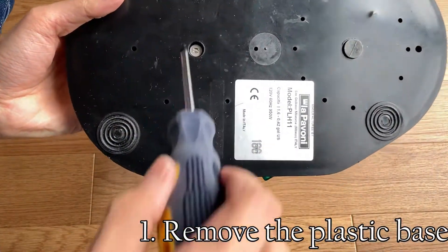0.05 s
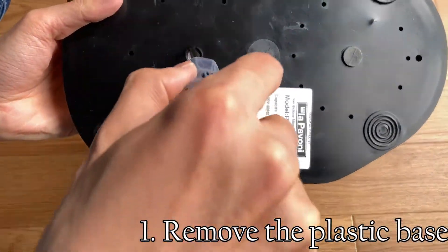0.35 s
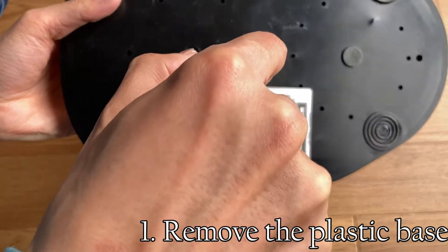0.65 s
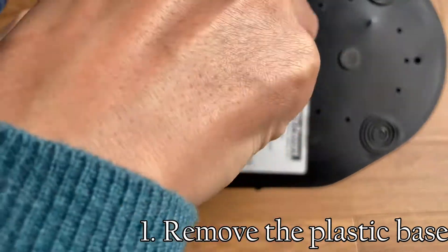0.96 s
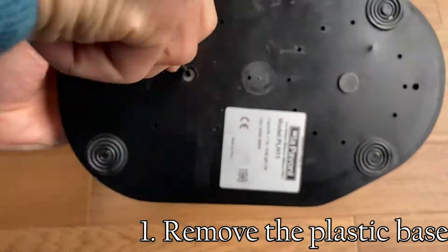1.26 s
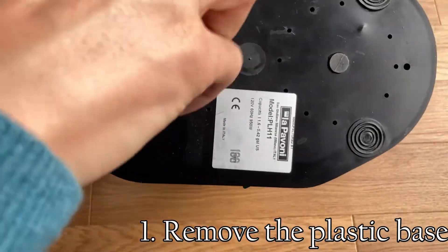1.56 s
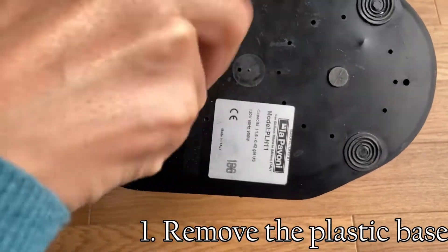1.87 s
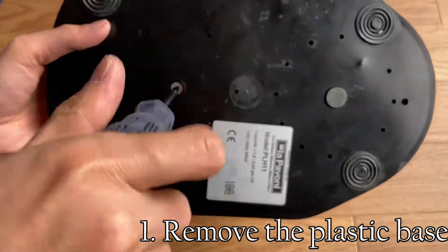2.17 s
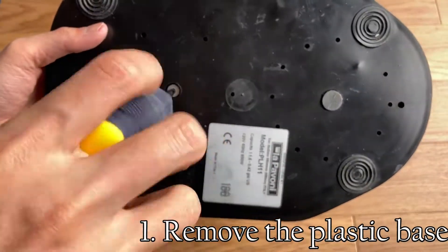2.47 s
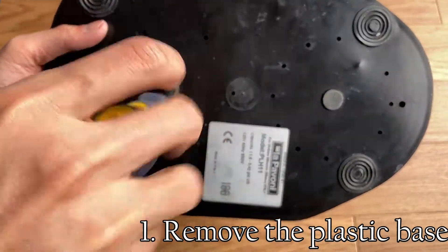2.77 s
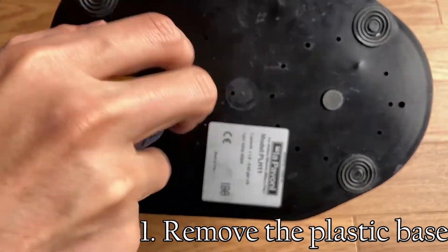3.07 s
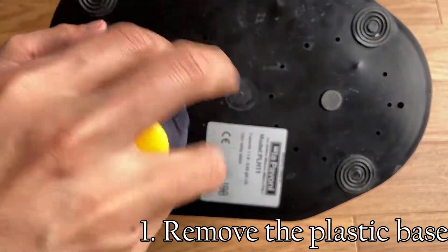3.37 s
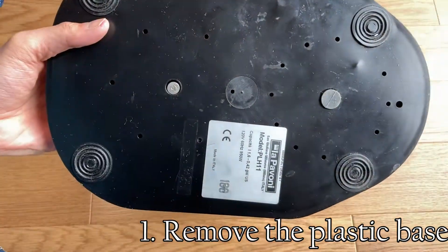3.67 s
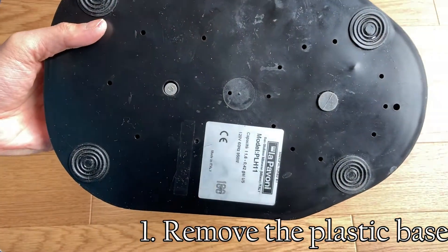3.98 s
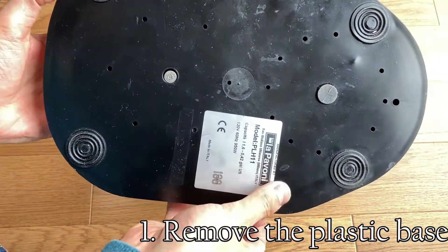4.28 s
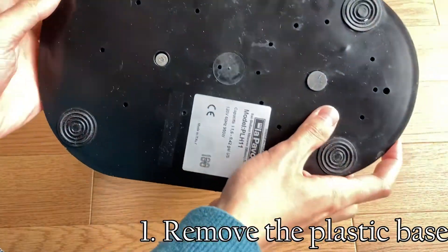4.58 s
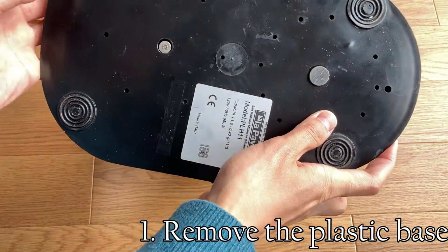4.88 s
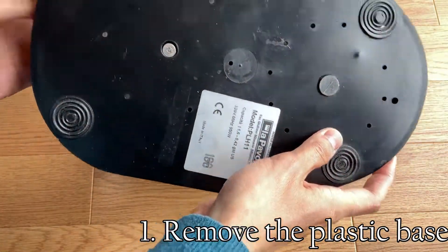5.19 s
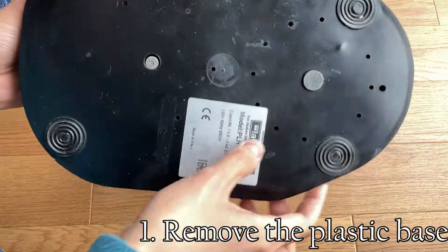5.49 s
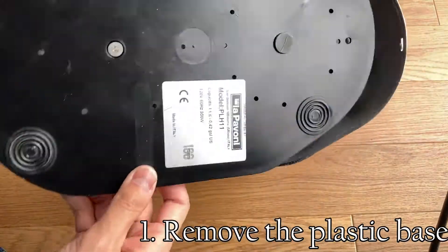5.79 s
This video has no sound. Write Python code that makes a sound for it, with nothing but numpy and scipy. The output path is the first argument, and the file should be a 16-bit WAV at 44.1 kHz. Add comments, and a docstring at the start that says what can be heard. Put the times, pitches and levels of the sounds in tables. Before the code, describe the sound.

A screwdriver tip taps and scrapes lightly as it settles into a screw in the plastic base of a small appliance. The thread cracks sharply twice, then turns with faint, uneven creaks. After a small clack and bump, hands rock the hollow base with soft knocks and rubbing until it snaps free. The microphone is close, in a quiet room with a low hum.

```python
"""Light taps, sharp cracks and small creaks: a screwdriver is set into a screw in the plastic base of a
small appliance and turned by hand; then the base is worked loose. Each knock is a brief grainy burst with
a soft attack and quick decay, ringing the hollow plastic shell. Fingers rub on handle and plastic,
the appliance bumps on its wooden support, and the room hums low."""
import sys
import numpy as np
from scipy import signal
from scipy.fft import rfft, irfft, next_fast_len
from scipy.io import wavfile

SR = 44100
rng = np.random.default_rng(int(sys.argv[2]) if len(sys.argv) > 2 else 0)


def waveform_to_disk(signal):
    """Save audio, clipped to [-1, 1], as 16-bit WAV at the path in sys.argv[1]."""
    frames = np.transpose(np.atleast_2d(signal))
    scaled = np.clip(frames, -1, 1) * 32767
    samples = np.round(scaled).astype(np.int16)
    wavfile.write(sys.argv[1], SR, samples)


N = 266408
N_FFT = next_fast_len(N, real=True)
PIVOT_HZ = 600  # hardness tilts a knock about this pitch

# centres of six registers, thud, body, knock, clack, snap, tick: (frequency [Hz])
REGISTER_HZ = [130, 380, 1000, 2100, 3500, 5200]
# tip meets or leaves the screw head, then the tool is put down:
# (peak [s], level [dB], hardness [dB/octave], ring [Hz], attack [s/60 dB], decay [s/60 dB])
TAPS = [(.312, -49, -6.5, 377, .008, .05), (.46, -42.5, -2.5, 415, .014, .045),
        (.5, -55, -1.5, 1427, .05, .06), (.531, -38.5, -.5, 382, .008, .033),
        (.553, -50.5, -.5, 1351, .06, .07), (.592, -55, -1, 495, .07, .08),
        (.645, -45.5, 2.8, 2030, .005, .011), (.681, -49, .3, 964, .028, .042),
        (.716, -56, 1.5, 1330, .05, .04), (.815, -40, .5, 1927, .016, .045),
        (.848, -46, 1.5, 662, .045, .04), (3.715, -48, 4.2, 1529, .026, .08),
        (3.738, -53, 3, 1427, .07, .085), (3.775, -39, -1.3, 883, .026, .038)]
# thread creaks, fingers slip on the handle: (peak [s], creak [dB], slip [dB])
TWISTS = [(.985, -56, -74), (1.099, -57, -75), (1.153, -59, -75), (1.205, -63, -73), (1.574, -68, -64),
          (1.617, -68, -88), (1.717, -47.5, -65), (1.798, -64, -77), (1.833, -55.5, -71),
          (1.911, -57.5, -65), (1.968, -57.5, -69), (1.998, -65, -74), (2.094, -64, -80),
          (2.151, -63.5, -82), (2.275, -68, -90), (2.36, -72, -80), (2.41, -66, -75), (2.467, -64.5, -77),
          (2.49, -77, -69), (2.526, -61, -80), (2.555, -72, -68), (2.602, -58, -67), (2.693, -55.5, -70),
          (2.778, -73, -81), (2.82, -70, -74), (2.852, -69, -78), (2.881, -61, -73), (2.922, -61.5, -70),
          (2.984, -62.5, -70), (3.03, -71, -71), (3.071, -67.5, -86), (3.105, -60.5, -76),
          (3.135, -60, -69), (3.21, -67, -77), (3.249, -46.5, -65), (3.287, -57.5, -72), (3.328, -62, -71),
          (3.355, -63, -71), (3.39, -68.5, -84), (3.42, -85, -74), (3.492, -64, -68)]
# appliance meets its support: (time [s], level [dB])
BUMPS = [(2.095, -52), (3.72, -46), (3.773, -37), (3.81, -44), (4.212, -40), (4.428, -45), (4.468, -42),
         (4.615, -46), (4.997, -36), (5.24, -45), (5.788, -44)]


def cracks():
    """Strain lets go at once: the thread cracks twice, and at last the base snaps free."""
    # (peak [s], level [dB], ring [Hz], decay [s/60 dB])
    releases = [(1.035, -25.5, 361, .042), (1.517, -35.5, 385, .055), (5.79, -27, 759, .05)]
    colour_db, attack_s = np.array([-15, 0, -.3, -4, -10.5, -7.5]), .03
    blows = [(s, db + colour_db, hz, attack_s, decay_s) for s, db, hz, decay_s in releases]
    return knocks(blows, ring_db=3, tail_db=-25, tail_t60_s=.16, echo_gain=.45)


def taps():
    """Steel on screw and plastic: some taps start sharply, others fade in softly."""
    # colour of a tap, per register: (gain [dB])
    colour_db = [-16, -1, 1, -5, -14, -22]
    blows = [(s, db + tilt(hardness) + colour_db, hz, attack_s, decay_s)
             for s, db, hardness, hz, attack_s, decay_s in TAPS]
    return knocks(blows, direct_db=-5, crest_s=.0015)


def twists():
    """Creaks of one screw in its post; the louder, the more abrupt."""
    colour_db, post_hz = np.array([-16, 7.5, 1, -5, -16, -14]), [380, 580]
    reference_db, halving_db = -62, 19
    blows = []
    for s, db, slip_db in TWISTS:
        levels_db = db + colour_db
        levels_db[-1] = max(levels_db[-1], slip_db)
        stretch = min(2 ** ((reference_db - db) / halving_db), 1.3)
        blows.append((s, levels_db, post_hz, .05 * stretch, .042 * stretch))
    return knocks(blows, per_s=5000, direct_db=-7, ring_db=1, tail_db=-25, echo_gain=.45)


def grips():
    """Hands rock the loose base against its rim: soft knocks with a tick of the fingertips."""
    # (peak [s], level [dB], hardness [dB/octave], tick [dB], ring [Hz])
    pushes = [(.338, -51, -8.5, -90, 371), (1.348, -75, 5, -74, 1550), (3.925, -68, 1.5, -78, 285),
              (4.015, -72, 7, -65, 2288), (4.204, -44, -2.5, -68, 800), (4.215, -38, -7, -63, 323),
              (4.295, -54, -11.5, -70, 345), (4.332, -53, -10.5, -74, 345), (4.402, -47.5, -2.5, -64, 415),
              (4.43, -44, -7.5, -62, 339), (4.47, -57, 1.5, -58, 301), (4.618, -37.5, -2.5, -55, 334),
              (4.78, -37, -2.5, -54, 318), (4.81, -48, -9, -83, 393), (4.884, -40.5, -4.5, -63, 495),
              (4.942, -38.5, -10, -67, 930), (4.999, -38, -3.3, -60, 334), (5.05, -42.5, -3.5, -63, 1600),
              (5.085, -44.5, -6.5, -75, 942), (5.18, -52.5, -10, -90, 759), (5.213, -53, -10, -90, 700),
              (5.268, -53, -4.5, -60, 600), (5.305, -51.5, -5, -68, 560), (5.395, -47.5, -5, -72, 899),
              (5.585, -48.5, -3.3, -59, 560), (5.633, -52.5, -3.7, -69, 576), (5.662, -51.5, -7, -69, 581),
              (5.69, -56, -3.3, -58, 565), (5.738, -61, 1, -58, 587), (5.835, -43, -4, -57, 915),
              (5.892, -36, -9.5, -61, 900)]
    colour_db, attack_s, decay_s = [-16, -.5, .3, -7, -12.5], .041, .048
    blows = []
    for s, db, hardness, tick_db, hz in pushes:
        lift_db = tilt(hardness)[:-1]
        if hardness < 0:  # flat up to the ring, duller above
            lift_db = np.minimum(lift_db, hardness * np.log2(hz / PIVOT_HZ))
        blows.append((s, np.append(db + lift_db + colour_db, tick_db), hz, attack_s, decay_s))
    return knocks(blows, ring_db=7.5, ring_width_hz=42)


def knocks(blows, per_s=9000, direct_db=-4, ring_db=6, ring_width_hz=45, tail_db=-24, tail_t60_s=.17,
           echo_gain=.5, crest_s=.002):
    """Grainy bursts with soft attack, quick decay and short tail, coloured by shell and a near echo."""
    # force spectrum of one contact: (frequency [Hz], density [dB])
    contact_spectrum = [(60, -2), (155, 6), (220, -2), (370, 0), (600, 0), (1000, 0), (1700, -2), (2600, 1),
                        (3800, -3), (4900, 2), (8300, 0), (11000, -4), (15500, -11)]
    # register boundaries: (frequency [Hz])
    edges_hz = [70, 250, 650, 1500, 2800, 4500, 17000]
    size, lead_s, echo_s = 6144, .036, .0037
    t, hz = np.arange(size) / SR - lead_s, np.fft.rfftfreq(size, 1 / SR)
    core = (t > -.006) & (t < .012)
    before_s, after_s = np.maximum(-t - crest_s, 0), np.maximum(t - crest_s, 0)
    reflection = 1 + echo_gain * np.exp(-2j * np.pi * hz * echo_s)
    body = gain_of(curve(contact_spectrum, hz)) * shell(hz, direct_db) * reflection
    lo_hz, hi_hz = np.array([edges_hz[:-1], edges_hz[1:]])[:, :, None]
    registers = 1 / np.sqrt((1 + (lo_hz / (hz + 1)) ** 16) * (1 + (hz / hi_hz) ** 16))
    age = after_s / 1.2 ** np.log10(1500 / hi_hz)  # lows die more slowly
    tail = gain_of(tail_db - 60 * age / tail_t60_s)
    out = np.zeros((2, N))
    for s, colour_db, ring_hz, attack_s, decay_s in blows:
        levels_db = np.append(max(colour_db[0], thud_db(s)), colour_db[1:])
        envelope = gain_of(-60 * before_s / attack_s) * (gain_of(-60 * age / decay_s) + tail)
        burst = grains(size, per_s=per_s, spread_db=2.5)[:, None] * envelope
        colour = gain_of(curve(list(zip(REGISTER_HZ, levels_db)), hz))
        spot = 1 + sum(resonance(hz, f, ring_width_hz, ring_db) for f in np.atleast_1d(ring_hz))
        bands = irfft(stereo(rfft(burst), hz) * body * colour * spot * registers)
        bands /= np.sqrt(np.mean(bands[..., core] ** 2, axis=(0, 2)))[:, None]
        add(out, s - lead_s, gain_of(levels_db) @ bands)
    return gain_of(-1.4) * out


def shell(hz, direct_db=-4):
    """Response of the plastic shell: direct path plus modes."""
    # (frequency [Hz], width [Hz], gain [dB])
    modes = [(225, 30, -4), (361, 55, 9), (440, 50, 1), (577, 32, 3), (752, 38, -1), (900, 65, 5),
             (1053, 42, 1), (1180, 48, 3), (1510, 35, 0), (1640, 35, -1), (2010, 75, 3), (2160, 55, 0),
             (2400, 50, 0), (2490, 40, 4), (2830, 50, 2), (3150, 30, 2), (3400, 35, -1), (3565, 35, 1)]
    return gain_of(direct_db) + sum(resonance(hz, *mode) for mode in modes)


def tilt(hardness):
    """Gain [dB] per register: harder contacts lift the treble; the thud is unaffected."""
    return hardness * np.append(0, np.log2(np.array(REGISTER_HZ[1:]) / PIVOT_HZ))


def thud_db(s):
    """Low thud of a blow that drives the appliance onto its support."""
    return max([db - 3 for bump_s, db in BUMPS if abs(bump_s - s) < .02], default=-np.inf)


def shaft(ring_hz=4850, t60_s=.1, seated_s=.7):
    """Short rattles of the tip ring the free steel shaft until the tip is seated."""
    t, out = np.arange(SR // 4) / SR, np.zeros((2, N))
    mode = gain_of(-60 * t / t60_s) * np.sin(2 * np.pi * ring_hz * t)
    for s, db, hardness, *_ in TAPS:
        if s < seated_s:
            ring = signal.fftconvolve(grains(128, per_s=9000, spread_db=2), mode[None], axes=1)
            peak_db = db - 20 + min(tilt(hardness)[-1], 0)
            add(out, s, gain_of(peak_db) * ring / abs(ring).max())
    return out


def bumps(rise_s=.005):
    """Soft pushes ring the low modes of the wooden support, alike in both channels."""
    # (frequency [Hz], gain [dB], t60 [s])
    modes = [(68, -3, .45), (88, -3, .25), (125, -2, .13), (194, -6, .22)]
    t, out = np.arange(SR // 2) / SR, np.zeros((2, N))
    onset = 1 - np.exp(-t / rise_s)
    for s, db in BUMPS:
        ring = sum(gain_of(mode_db - 60 * t / t60_s) * np.sin(2 * np.pi * (hz * t + rng.random()))
                   for hz, mode_db, t60_s in modes)
        add(out, s, gain_of(db) * (ring * onset)[None])
    return out


def rubbing():
    """Dense slips: screw and base scrape through the shell, skin hisses directly."""
    # tip or hand slides on plastic: (middle [s], length [s], scrape [dB], hiss [dB])
    strokes = [(.14, .28, -83, -88), (.59, .28, -59.5, -85), (1.05, .2, -67, -81), (1.235, .12, -71, -72),
               (1.68, .2, -76, -90), (1.94, .18, -75, -90), (2.47, .26, -73, -91), (2.98, .42, -72, -92),
               (3.31, .16, -73, -90), (3.58, .2, -82, -88), (3.76, .13, -63, -87), (4.1, .17, -68, -70),
               (4.45, .13, -64, -70), (4.52, .06, -82, -77), (5.01, .22, -63.5, -80), (5.2, .09, -71, -94),
               (5.32, .12, -72, -80), (5.51, .14, -66, -75), (5.71, .17, -65, -68), (5.93, .24, -71, -78)]
    # scraping friction: (frequency [Hz], density [dB])
    scrape_spectrum = [(150, -30), (350, -5), (600, 0), (1100, -2), (2300, -8), (3500, -21), (7000, -38)]
    # skin friction: (frequency [Hz], density [dB])
    skin_spectrum = [(1000, -20), (3000, -6), (5500, -3), (8500, 0), (11000, -3), (15500, -5)]
    hz = np.fft.rfftfreq(N_FFT, 1 / SR)
    coarse = stereo(rfft(grains(N_FFT, per_s=1500, spread_db=3)), hz)
    fine = stereo(rfft(grains(N_FFT, per_s=12000, spread_db=2.5)), hz)
    scrape = irfft(coarse * shell(hz) * gain_of(curve(scrape_spectrum, hz)), N_FFT)
    hiss = irfft(fine * gain_of(curve(skin_spectrum, hz)), N_FFT)
    scrape_gain, hiss_gain = np.full((1, N), gain_of(-89)), np.full((1, N), gain_of(-92))  # hands at rest
    for s, length_s, scrape_db, hiss_db in strokes:
        add_slide(scrape_gain, s, length_s, scrape_db - 1.5)
        add_slide(hiss_gain, s, length_s, hiss_db)
    for s, _, slip_db in TWISTS:
        add_slide(hiss_gain, s, length_s=.045, db=slip_db - 6)
    return unit_rms(scrape[:, :N]) * scrape_gain + unit_rms(hiss[:, :N]) * hiss_gain


def add_slide(envelope, middle_s, length_s, db):
    """A slide speeds up, holds and stops."""
    speed = signal.windows.tukey(round(length_s * SR), .7)
    add(envelope, middle_s - length_s / 2, gain_of(db) * speed[None])


def room(air_db=-64.5):
    """Faint steady air noise with narrow rumbles."""
    # (frequency [Hz], density [dB])
    air_spectrum = [(20, -27), (32, -17), (50, -6), (70, 0), (100, -6), (150, -22), (215, -12), (380, -16),
                    (500, -25), (1000, -36), (2000, -37), (2800, -44), (5000, -43), (9000, -47),
                    (15000, -53)]
    # (frequency [Hz], width [Hz], level [dB])
    rumbles = [(69, 9, -62.5), (222, 14, -70), (365, 40, -74)]
    hz = np.fft.rfftfreq(N_FFT, 1 / SR)
    air = stereo(rfft(rng.standard_normal((2, N_FFT))), hz, stray_share=.12)
    drone = stereo(rfft(rng.standard_normal((2, N_FFT))), hz, stray_share=.04)
    out = gain_of(air_db) * unit_rms(irfft(air * gain_of(curve(air_spectrum, hz)), N_FFT))
    for centre_hz, width_hz, db in rumbles:
        out += gain_of(db) * unit_rms(irfft(drone / (1 + ((hz - centre_hz) / width_hz) ** 2), N_FFT))
    return out[:, :N]


def stereo(spectra, hz, stray_share=.03):
    """Two spectra as sum and difference of a close microphone pair; its spacing combs the treble."""
    # (frequency [Hz], phase between the pair [rad])
    phases = [(60, .5), (200, .28), (380, .72), (700, 1.3), (1100, 1.05), (2400, 1.15), (4000, 1.3),
              (4700, 2.0), (5600, 3.1), (8700, 6.28), (12000, 9.42), (15300, 12.5)]
    side_share = np.clip(np.sin(curve(phases, hz) / 2) ** 2, stray_share, 1 - stray_share)
    mid, side = spectra[0] * np.sqrt(1 - side_share), spectra[1] * np.sqrt(side_share)
    return np.array([mid + side, mid - side])


def grains(size, per_s, spread_db):
    """Two trains of random impulses of uneven strength."""
    strength = gain_of(spread_db * np.minimum(rng.exponential(1, (2, size)), 3))
    return unit_rms(strength * rng.choice([-1, 1], (2, size)) * (rng.random((2, size)) < per_s / SR))


def resonance(hz, centre_hz, width_hz, db):
    return gain_of(db) / (1 + 2j * (hz - centre_hz) / width_hz)


def gain_of(db):
    return 10 ** (np.asarray(db) / 20)


def unit_rms(x):
    return x / np.sqrt(np.mean(x ** 2) + 1e-20)


def curve(points, hz):
    knots_hz, values = np.transpose(points)
    return np.interp(np.log(hz + 1), np.log(knots_hz + 1), values)


def add(mix, start_s, sound):
    start = round(start_s * SR)
    part = mix[:, start:start + sound.shape[1]]
    part += sound[:, :part.shape[1]]


def scene():
    """Support and room under tool, screw and hands."""
    return bumps() + room() + rubbing() + cracks() + taps() + twists() + grips() + shaft()


def record(dry):
    """Low-pass at 15.9 kHz."""
    lowpass = signal.firwin(511, 15900, window=("kaiser", 9), fs=SR)
    return signal.oaconvolve(dry, lowpass[None], "same")


dry = scene()
out = record(dry)
waveform_to_disk(out)
```